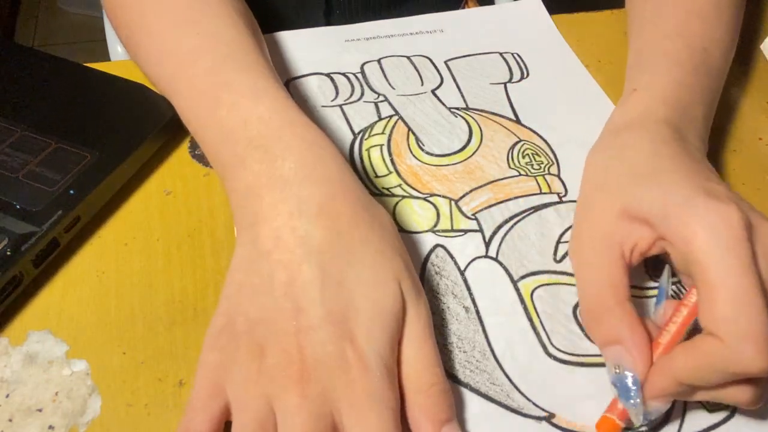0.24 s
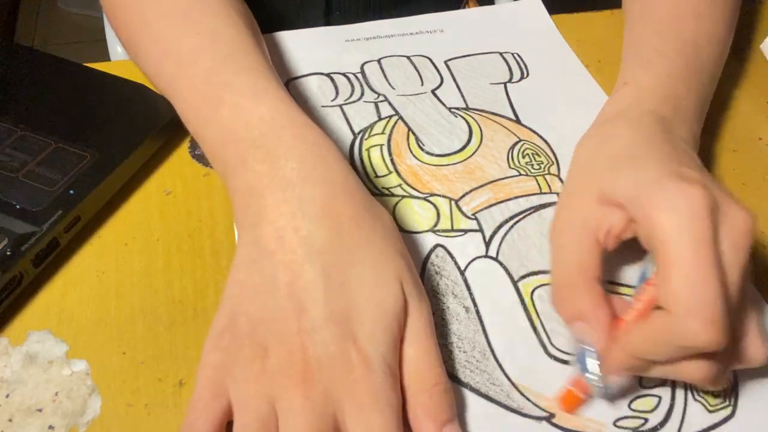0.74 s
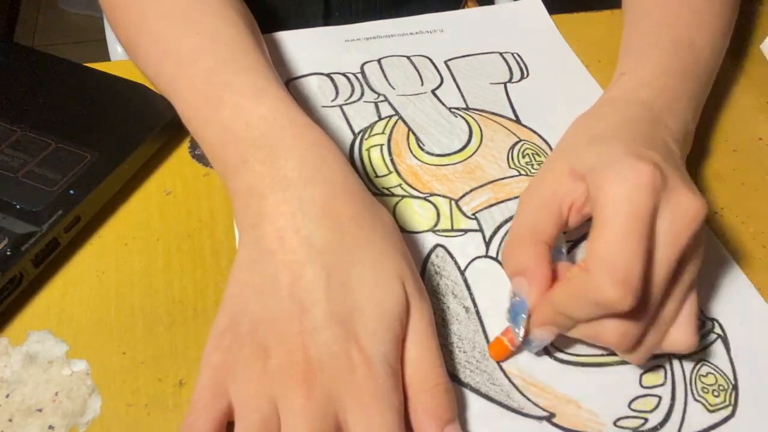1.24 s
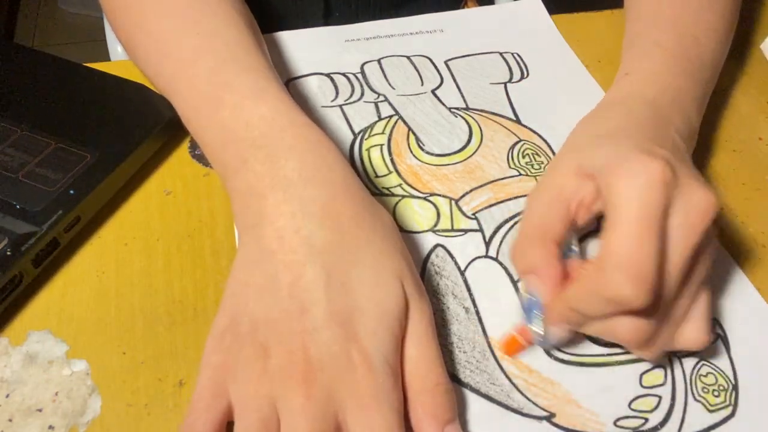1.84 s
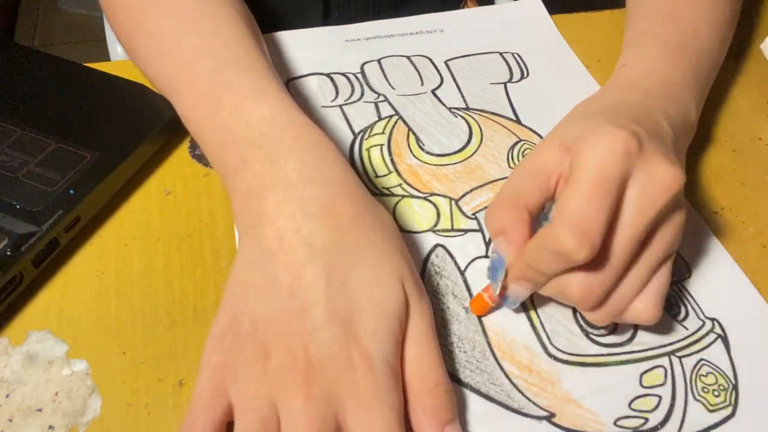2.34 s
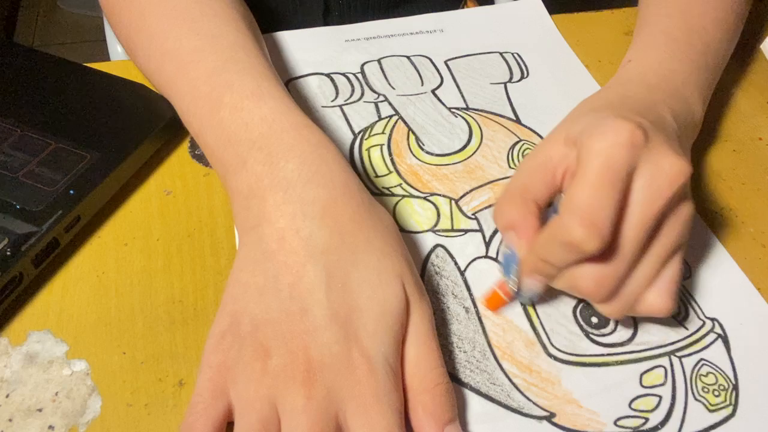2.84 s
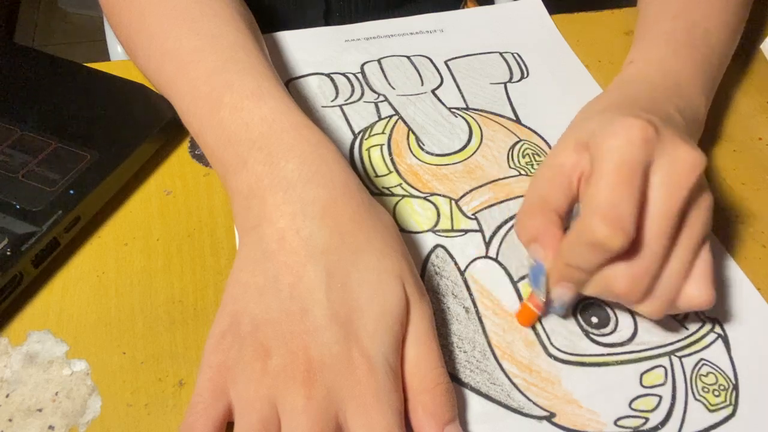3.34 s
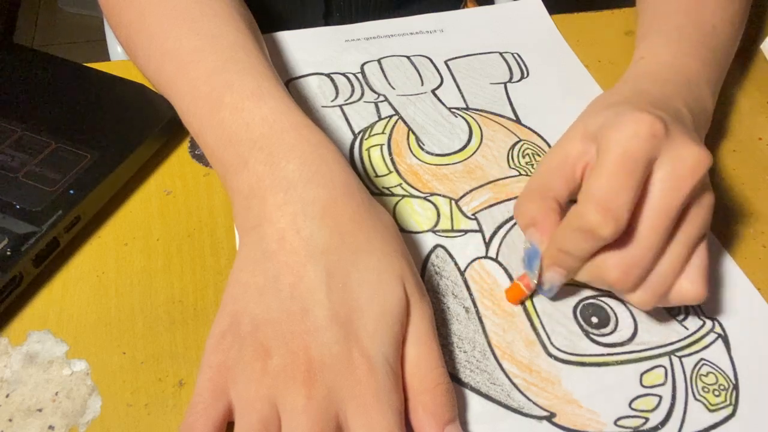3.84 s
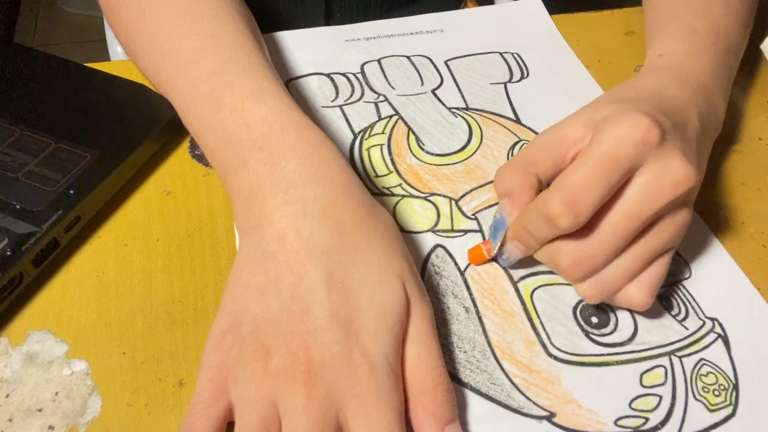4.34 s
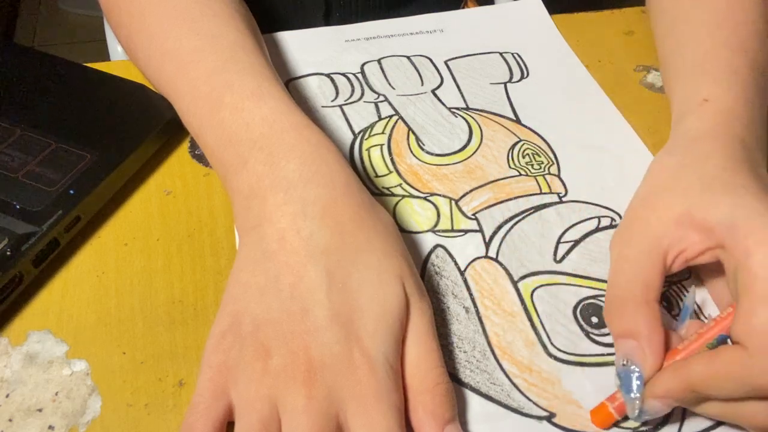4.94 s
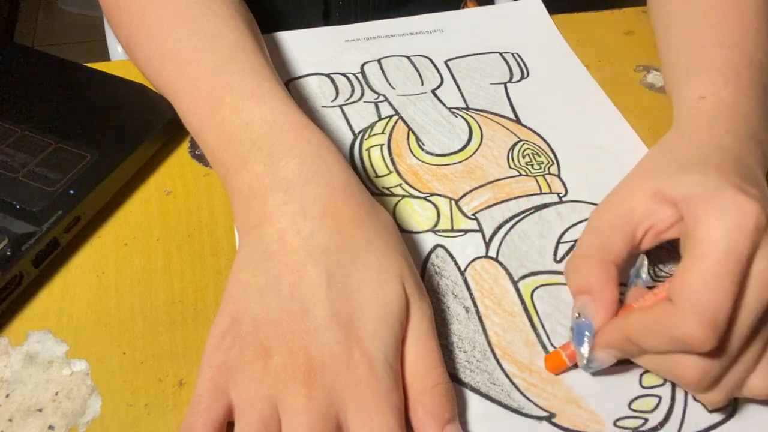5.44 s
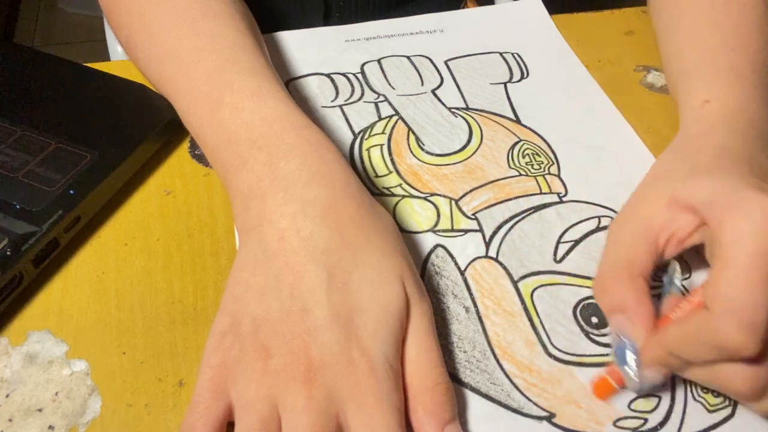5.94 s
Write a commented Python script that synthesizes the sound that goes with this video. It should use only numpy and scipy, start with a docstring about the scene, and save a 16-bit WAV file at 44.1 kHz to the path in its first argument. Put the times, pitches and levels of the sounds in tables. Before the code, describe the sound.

Throughout about six seconds, a low motor hum wavers slowly, leaning slightly right, with a soft, dark rush of air. Close in front, a wax crayon rubs paper to and fro about seven times a second; each stroke is a short grainy burst, hissy on top with a dry papery rustle and rub below. It starts softly and quickly firms up. Very thin, barely noticeable squeaks pass at 0.55 and 0.7 s. Small woody ticks scatter from 0.4 to 3.4 s, with the sharpest at 1.25 and 2.6 s and a lesser one at 2.3 s. Strokes weaken around 3.8 to 4.3 s, then a longer, stronger swish comes at 4.55 s and a weaker one at 4.75 s. After a brief gap with only hum and air, quick rubbing resumes at 5.1 s and continues to the end. The crayon has a very short, faint room echo.

```python
"""At a wooden table, a wax crayon is rubbed to and fro on a sheet of paper, mostly about seven strokes a second.
Each stroke is a burst of tiny clicks of wax on fibres; now and then the crayon ticks, and twice it squeaks.
Appliance motors hum as plain tones in slowly beating pairs; filtered noise makes a steady rush of air.
Two close microphones hear it, with a short echo of the crayon."""
import sys
import numpy as np
from scipy import signal
from scipy.fft import rfft, irfft, next_fast_len
from scipy.io import wavfile

SR = 44100
rng = np.random.default_rng(int(sys.argv[2]) if len(sys.argv) > 2 else 0)


def digitize_waveform(pressure):
    """Quantize a signal to 16-bit integers and store it at the path in sys.argv[1].

    Rows of a 2-D input are taken as channels; values are limited to [-1, 1].
    """
    field = np.atleast_2d(pressure).T
    bounded = np.clip(field, -1, 1)
    quanta = np.round(bounded * 32767).astype(np.int16)
    wavfile.write(sys.argv[1], SR, quanta)


N = 273420   # samples, about 6.2 s
SIZE = next_fast_len(N)
HZ = np.maximum(np.arange(SIZE // 2 + 1) * SR / SIZE, 1)   # every frequency of a spectrum
TIME = np.arange(N) / SR   # seconds

# motor tones in beating pairs: lower_hz, upper_hz, in_step_s
MOTOR_PAIRS = [(48.27, 48.686, 4.087), (96.554, 97.416, 3.772), (144.76, 148.57, 3.054)]
# their levels before swells and panning: lower_db, upper_db
MOTOR_PAIR_LEVELS = [(-52.3, -50.2), (-67, -63), (-51.5, -48.5)]
# how far the left side leads, one value per pair: lead_radians
MOTOR_PAIR_LEADS = [-.35, -.37, -.06]
# the hum wavers: time_s, lower_tone_of_two_deep_pairs_db, lower_tone_of_top_pair_db, all_upper_tones_db
MOTOR_SWELLS = [(0, 4, -25, -14), (.2, -1, 1.5, -1), (.45, 1, -1.5, -2.5), (.75, 0, -3, -2.5),
                (1.25, 2.5, -5, -5), (1.6, -3, 1.5, 0), (2.4, -1, 0.5, 0.5), (2.75, 1.5, -1, 0),
                (3.15, -8, -0.5, -0.5), (3.5, -2.5, -0.5, -0.5), (4.5, -1, -1.5, 0.5), (5.25, -1, -2, 0),
                (5.6, -2, -4, 1), (6.2, -10, -2, 3)]
# faint tones near the lower tone of the top pair make it swell unevenly: pitch_hz, level_db, in_step_s
MOTOR_NEIGHBOURS = [(143.01, -66, 2.836), (145.46, -62, 3.49), (146.11, -65.5, 2.954),
                    (146.31, -66.5, 3.164), (146.51, -68, 3.08)]
# motor tones without a partner: pitch_hz
LONE_TONES = [118.17, 168, 200.6, 248, 1162.3, 1216, 1288]
# their levels before wavering and panning: level_db
LONE_LEVELS = [-66, -67, -59, -65, -79.5, -89.5, -85.5]
MOTOR_PAN_DB = -7   # left minus right

# colour of the rush of air before it swells: pitch_hz, level_db_per_hz, left_minus_right_db
AIR_COLOUR = [(28.3, -102, -13), (40.3, -82, 7), (64, -70.5, 1.5), (81.5, -75, -4), (123, -73.5, -6.5),
              (152, -76.5, -8), (183, -75.5, -9), (319, -83.5, -4), (446, -80, 0), (532, -90, -2.5),
              (718, -92.5, 2), (742, -101, 1), (874, -93.5, 3.5), (1025, -89, 0), (1390, -99, 1.5),
              (1910, -100.5, -2), (2860, -113, 0), (5150, -120, 1.5), (7140, -118, -5), (8460, -124, -3),
              (10200, -130, 5), (14700, -131, 1)]
# how much of the air both sides share: pitch_hz, likeness (0 to 1)
AIR_LIKENESS = [(60, 0.83), (200, 0.96), (330, 0.2), (550, 1), (1000, 0.22), (3000, 0.39)]
# how far the left side leads in the air: pitch_hz, lead_radians
AIR_LEADS = [(250, 0.046), (400, 0.54), (650, 3.5), (900, 4)]

# colour of the rubbing, levelled later by the strokes: pitch_hz, level_db_per_hz, left_minus_right_db
RUB_COLOUR = [(216, -73, 3), (444, -82.5, -1.5), (620, -91.5, -4.5), (1050, -99, -5), (1320, -93.5, -3.5),
              (1930, -94.5, -2.5), (2750, -93, 2), (2810, -101, 0.5), (4030, -101, -9.5), (4100, -101.5, 7),
              (5130, -104.5, -1.5), (6000, -104.5, -8.5), (7900, -100.5, -2), (9100, -103, -4),
              (9200, -107, 0.5), (11100, -105, 2), (13700, -103, -3), (16800, -108, 8)]
# how much of the rubbing both sides share: pitch_hz, likeness (0 to 1)
RUB_LIKENESS = [(300, .8), (1000, .6), (6500, .45), (8000, .7), (9200, .9), (15000, .92)]
# every stroke and slide, before the patchiness:
# top_speed_s, width_within_6_db_ms, tip_hiss_db, sheet_rustle_db, table_rub_db
STROKES = [(0.076, 69, -79, -80.1, -79), (0.203, 70.0, -72.5, -74, -69.8), (0.35, 77, -71.5, -74, -68),
           (0.479, 82, -72.5, -73, -68), (0.625, 93, -71.5, -69.5, -66.5), (0.761, 69, -69, -70.3, -67),
           (0.904, 79, -69.7, -70.5, -64.5), (1.036, 64, -70, -69.5, -66.5), (1.18, 87, -71.5, -73, -69.4),
           (1.315, 72, -68.5, -69.5, -64), (1.461, 78, -69, -71.5, -71), (1.601, 65, -71.9, -73.5, -66.5),
           (1.752, 68, -70, -71.5, -69.5), (1.88, 67, -69, -71, -66), (2.019, 87, -70, -71.5, -68.9),
           (2.156, 73.0, -70, -71.5, -65.5), (2.301, 84, -67.5, -69, -66), (2.436, 77, -70, -72, -67.5),
           (2.58, 90, -66.5, -68, -68.5), (2.712, 80, -71.2, -71, -69), (2.855, 86, -70.2, -71, -70.5),
           (2.996, 71, -71.5, -72.5, -67.5), (3.135, 82, -69.7, -70.0, -67), (3.279, 72, -70.5, -71, -67),
           (3.416, 73, -68.5, -68.5, -69.5), (3.557, 75, -70.5, -71.5, -65.5), (3.691, 73, -68, -70, -68.5),
           (3.835, 81, -75.5, -75, -69.5), (3.961, 73.0, -71.5, -71, -70.5), (4.091, 63.0, -77, -77.5, -74),
           (4.231, 73.0, -76.5, -78, -75), (4.33, 120, -81, -82, -76), (4.44, 110, -71, -74.5, -71.5),
           (4.555, 157, -66.5, -67, -66.5), (4.764, 109, -76.5, -77.5, -71), (5.124, 62, -73.5, -76.5, -74),
           (5.252, 83, -71.5, -73.5, -69.5), (5.402, 69, -71.6, -74.4, -68), (5.537, 83.0, -70, -71.5, -68),
           (5.682, 72, -69.3, -70, -70.5), (5.823, 84, -69.5, -70, -70.5), (5.961, 68, -68.5, -71, -72),
           (6.095, 73, -71.5, -71.5, -73)]
TIP_LAG_S, TIP_IN_STEP_HZ = 185e-6, 11900   # the tip is nearer the right microphone
TIP_BAND_HZ, SHEET_BAND_HZ, TABLE_BAND_HZ = (8500, 15500), (2800, 5500), (1400, 2800)   # bands to level by
RUMBLE_LUMPS_DB, COLOUR_SHIFT_DB = 3, 1   # typical swing of the low rumble, and of each band by itself
RING_ADDS_DB = 2   # taken off sheet and table, because the stirred modes add to them
STIR_DB, STIR_WIDTH, STIR_PATCHY_DB = -3, .05, 4   # level, width as a share of the pitch, typical swing

# ticks, levels before each mode's own: time_s, low_modes_db, middle_modes_db, high_modes_db, softness_ms
TICKS = [(.3755, -57, -72, -74, 1.8), (1.025, -70, -70, -65, 2.), (1.2558, -42.5, -58, -55.5, 1.5),
         (1.396, -57, -72, -72, 1.5), (1.458, -70, -61, -70, 1.5), (1.4895, -66, -54, -72, 1.5),
         (1.743, -56, -64, -66, 1.5), (1.866, -58, -65, -65, 1.5), (1.952, -66, -58, -76, 1.5),
         (2.139, -55, -62, -68, 1.5), (2.162, -53, -64, -70, 1.5), (2.291, -54, -62, -70, 1.8),
         (2.315, -47, -59, -61, 2.), (2.5862, -44, -51, -53, 2.), (2.642, -72, -76, -67, 3.),
         (2.86, -64, -64, -65, 1.5), (3.1315, -52, -62, -67, 1.8), (3.2335, -52.5, -66, -74, 1.8),
         (3.41, -55, -68, -70, 1.5)]
# what crayon and table ring with: pitch_hz, level_db (added to the level of the tick)
MODES = [(1230, -6.5), (1500, -1), (1900, -14), (2450, -6), (3000, -8), (3220, -4), (3900, -10), (4500, -7),
         (4900, -5), (7600, -10), (11500, -15)]
# the mode near 5 kHz is jostled on for a while: fall_to_a_third_ms, level_db (added to the mode)
RATTLE = (35, -7)
TICK_PAN_DB, TICK_RIGHT_LATE_MS = 2.5, 2.4   # left minus right; low modes reach the right late through the table
SCRAPE_MS, SCRAPE_DB = 22, -12   # time to fall to a third, level relative to the high modes
LOW_RING = 1.5   # how slowly the low modes die, in units of the softness
HARD_TAP_DB, DULLING = -44, .5   # softer taps lose the mode at 1500 Hz: dB lost per dB below a hard tap

# glides of the two squeaks, level on the left: time_s, pitch_hz, level_db
SQUEAKS = [
    [(.53, 15200, -95), (.565, 14900, -68), (.595, 15150, -92)],
    [(.63, 14000, -95), (.67, 13500, -85), (.72, 12950, -80), (.74, 12800, -95)],
]

ECHO_DB, ECHO_T60_S = -13, 0.061   # level of the echo, time for its tail to fall by 60 dB
CUTOFF_HZ = 15600


def from_db(db):
    """Turn decibels into a gain."""
    return 10 ** (np.asarray(db) / 20)


def at_hz(points, axis=1):
    """Read one column of a table at every frequency."""
    points = np.array(points)
    return np.interp(np.log(HZ), np.log(points[:, 0]), points[:, axis])


def pan(db):
    """Left and right gains that differ by this many decibels."""
    return from_db(np.multiply.outer([.5, -.5], db))


def drift(rate):
    """Slow random wandering around 0, typically by 1; a higher rate wanders faster."""
    pole = np.exp(-80 * np.pi * rate / SR)
    noise = rng.standard_normal(N // 40 + 2002)   # one value for every 40 samples
    slow = signal.lfilter([1], [1, -2 * pole, pole * pole], noise)[2000:]
    return np.interp(np.arange(N) / 40, np.arange(len(slow)), slow / slow.std())


def stereo(sources, colour, alike, lead):
    """Spectra of both sides: one shared source, shifted between the sides, plus one own source each."""
    shared, left, right = rfft(sources, SIZE)
    alike = np.clip(alike, 0, 1)
    shift = np.exp(np.multiply.outer([.5j, -.5j], lead))
    both = np.sqrt(alike) * shared * shift + np.sqrt(1 - alike) * [left, right]
    return both * from_db(at_hz(colour)) * pan(at_hz(colour, axis=2)) * np.sqrt(SR / 2)


def motors():
    """Humming tones; close pairs swell and fade as they drift in and out of step."""
    swell_s, *columns = np.transpose(MOTOR_SWELLS)
    deep_db, top_db, upper_db = (np.interp(TIME, swell_s, column) for column in columns)
    lower_swells = (deep_db, deep_db, top_db)
    hum = 0
    for (*pair, together), levels, lower_db, lead in zip(
            MOTOR_PAIRS, MOTOR_PAIR_LEVELS, lower_swells, MOTOR_PAIR_LEADS):
        for hz, db, swell_db in zip(pair, levels, (lower_db, upper_db)):
            turn = 2 * np.pi * hz * (TIME - together) + lead * np.array([[.5], [-.5]])
            hum = hum + from_db(db + swell_db + .4 * drift(1.2)) * np.cos(turn)

    low_hz, _, together = MOTOR_PAIRS[2]
    for hz, db, in_step in MOTOR_NEIGHBOURS:
        cycles = low_hz * (TIME - together) + (hz - low_hz) * (TIME - in_step)
        hum = hum + from_db(db) * np.cos(2 * np.pi * cycles)

    for hz, db in zip(LONE_TONES, LONE_LEVELS):
        gain = from_db(db + 2.7 * drift(3.7))
        hum = hum + gain * np.cos(2 * np.pi * hz * TIME + 0.83 * drift(2.25))
    return np.sqrt(2) * hum * pan(MOTOR_PAN_DB)[:, None]


def air():
    """Rush of moving air and rumble; bass, middle and treble swell a little, each in its own time."""
    sound = stereo(rng.standard_normal((3, N)), AIR_COLOUR, at_hz(AIR_LIKENESS), at_hz(AIR_LEADS))
    bass = 1 / (1 + (HZ / 290.0) ** 4)
    low = 1 / (1 + (HZ / 690.0) ** 4)   # bass and middle together
    parts = ((bass, 1.6), (low - bass, 1.6), (1 - low, 1.2))   # share, typical swing in dB
    return sum(irfft(sound * part, SIZE)[:, :N] * from_db(db * drift(6.4)) for part, db in parts)


def grains(per_s, spread_db):
    """Wax catching on paper fibres: three trains of uneven clicks at random moments."""
    sizes = from_db(spread_db * np.minimum(rng.exponential(1, (3, N)), 5))
    sizes = sizes * rng.choice([-1, 1], (3, N))
    clicks = sizes * (rng.random((3, N)) < per_s / SR)
    return clicks / clicks.std()


def strokes(rows, axis, squat):
    """Loudness follows the speed of the hand: a bell for every stroke, flatter on top when more squat."""
    power = np.zeros(N)
    for row in rows:
        top_s, half_s = row[0], row[1] / 2000
        start = max(round((top_s - 5 * half_s) * SR), 0)
        near = slice(start, round((top_s + 5 * half_s) * SR))
        distance = np.abs((TIME[near] - top_s) / half_s)
        power[near] += from_db(2 * row[axis] - 12 * distance ** squat)   # doubled dB, as this is power
    return np.sqrt(power)


def rubbing():
    """The tip hisses in the treble, sheet and table rustle below it; all are the same grains, patchy by band."""
    lead = 2 * np.pi * TIP_LAG_S * (TIP_IN_STEP_HZ - HZ) * (HZ > 500)   # the rumble arrives in step
    sound = stereo(grains(per_s=8000., spread_db=1.5), RUB_COLOUR, at_hz(RUB_LIKENESS), lead)
    sound = sound / np.sqrt(1 + (185.0 / HZ) ** 8)   # less deep bass

    # loudness of each band over time
    tip, sheet, table = (irfft(sound * (HZ > low) * (HZ < high), SIZE).std()
                         for low, high in (TIP_BAND_HZ, SHEET_BAND_HZ, TABLE_BAND_HZ))
    tip = strokes(STROKES, axis=2, squat=3.) / tip
    sheet = strokes(STROKES, axis=3, squat=2.) / sheet / from_db(RING_ADDS_DB)
    table = strokes(STROKES, axis=4, squat=1.9) / table / from_db(RING_ADDS_DB)

    grip = drift(24.0)   # the pressure of the hand trembles
    lumps = drift(6.1)
    out = 0
    for octave in np.arange(8, 15, .5):   # half-octave bands around 2 ** octave Hz
        share = np.clip(1 - 2 * np.abs(np.log2(np.maximum(HZ, 256)) - octave), 0, 1)
        level = tip if octave > 12.7 else sheet if octave > 11.3 else table
        patches = .7 * grip + 1.3 * drift(25.) + COLOUR_SHIFT_DB * drift(5.)
        patches = patches + RUMBLE_LUMPS_DB * lumps * (octave < 10)
        out = out + irfft(sound * share, SIZE)[:, :N] * level * from_db(patches)
    return out


def stirred(x):
    """Add the rubbing once more through all but the top two modes, each coming and going in its own time."""
    ringing = 0
    for hz, _ in MODES[:-2]:
        b, a = signal.iirpeak(hz, 1 / STIR_WIDTH, fs=SR)
        gain = from_db(STIR_DB + STIR_PATCHY_DB * drift(8.4))
        ringing = ringing + signal.lfilter(b, a, x) * gain
    return x + ringing


def ticks():
    """The crayon taps the table: modes swell and die, the low ones a little late, over a short scrape."""
    out = np.zeros((2, N))
    ms = TIME[:SR // 8] * 1000
    rattle_ms, rattle_db = RATTLE
    for s, low_db, middle_db, high_db, soft in TICKS:
        at = round(s * SR)
        here = slice(at, at + len(ms))
        scrape = signal.lfilter([1, -1], [1, -.5], rng.standard_normal((2, len(ms))))
        out[:, here] += from_db(high_db + SCRAPE_DB) * scrape * np.exp(-ms / SCRAPE_MS)
        for hz, level_db in MODES:
            db = low_db if hz < 2000 else middle_db if hz < 3500 else high_db
            db += DULLING * min(low_db - HARD_TAP_DB, 0) * (1300 < hz < 1700)

            # time since the mode set in, in units of the softness
            late = np.array([[0], [TICK_RIGHT_LATE_MS]]) * (hz < 2000)
            wait = 1.4 if hz < 2000 else .6 * (hz > 3500)
            age = np.maximum((ms - late) / soft - wait, 0)
            if hz > 2000:
                swell = age * np.exp(1 - age)
            else:
                swell = 2 * (np.exp(-age / LOW_RING) - np.exp(-2 * age))

            jostle = np.interp(ms, np.arange(0, 150, 5), rng.standard_normal(30))   # a new push every 5 ms
            rattle = from_db(rattle_db) * np.exp(-ms / rattle_ms) * jostle * (ms > soft)
            swell = swell + (4700 < hz < 5500) * rattle

            detune = rng.normal(1, .006)
            offset = rng.uniform(.3, .8) * np.array([[1], [-1]])   # the sides differ in phase
            wave = np.sin(2 * np.pi * hz * detune * ms / 1000 + offset)
            out[:, here] += from_db(db + level_db) * swell * wave * pan(TICK_PAN_DB)[:, None]
    return out


def squeak():
    """Thin high whistles of wax that slips: gliding tones, half as strong and upside down on the right."""
    out = np.zeros(N)
    for rows in SQUEAKS:
        s, hz, db = np.transpose(rows)
        gain = from_db(np.interp(TIME, s, db, left=-200, right=-200))
        out += gain * np.sin(2 * np.pi * np.cumsum(np.interp(TIME, s, hz)) / SR)
    return out * [[1], [-.5]]


def room(x):
    """A short blurred echo: a fading, dulled noise tail, a different one on each side."""
    time = TIME[:SR // 3]
    tail = rng.standard_normal((2, len(time))) * from_db(-60 * time / ECHO_T60_S)
    tail = tail / np.sqrt(np.sum(tail ** 2, axis=1, keepdims=True))
    dulled = signal.lfilter([.4], [1, -.6], tail)
    return signal.fftconvolve(x, dulled, axes=1)[:, :N]


def scene():
    """Add up the crayon, its echo, the motors and the air."""
    crayon = stirred(rubbing()) + ticks() + squeak()
    return crayon + from_db(ECHO_DB) * room(crayon) + motors() + air()


def record(dry):
    """Cut the highest treble with a steep filter."""
    low_pass = signal.ellip(10, .5, 70, CUTOFF_HZ, fs=SR, output="sos")   # ripple .5 dB, cut 70 dB
    return signal.sosfilt(low_pass, dry)


dry = scene()
out = record(dry)
digitize_waveform(out)
```